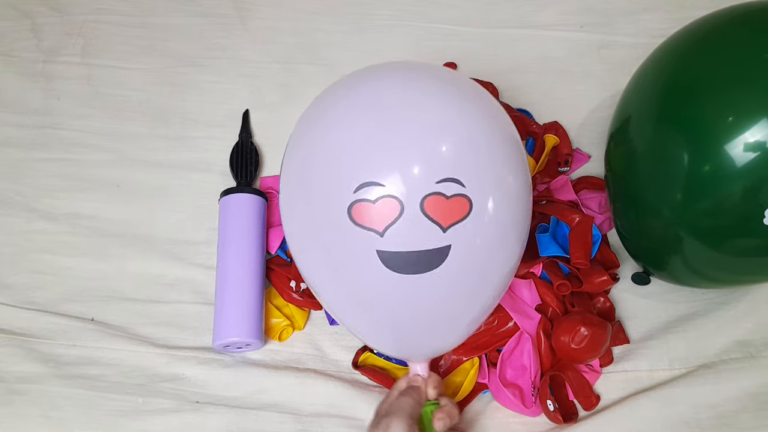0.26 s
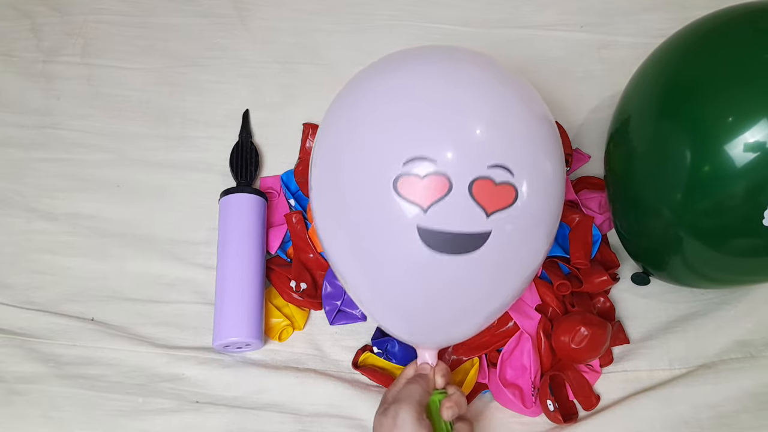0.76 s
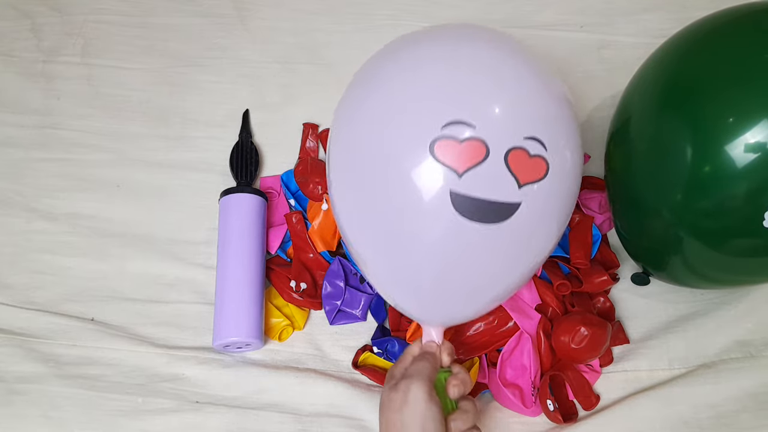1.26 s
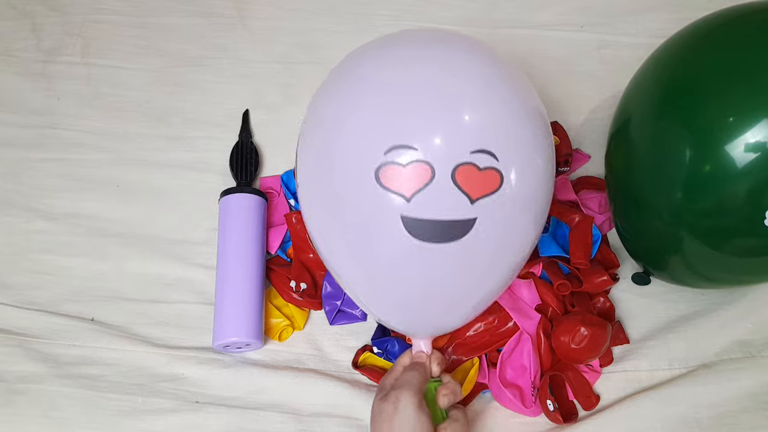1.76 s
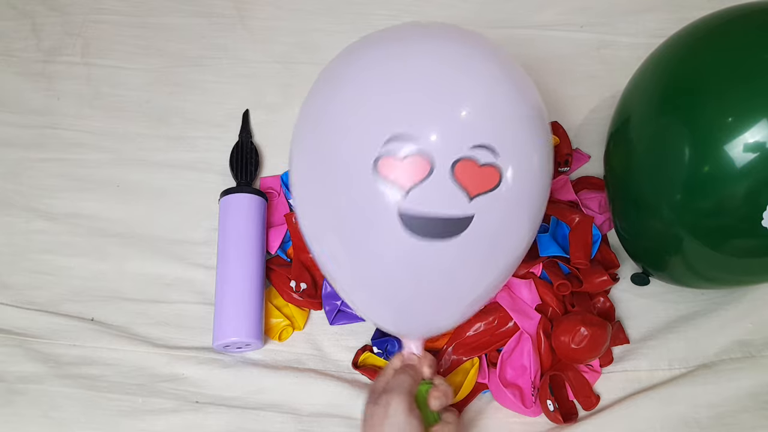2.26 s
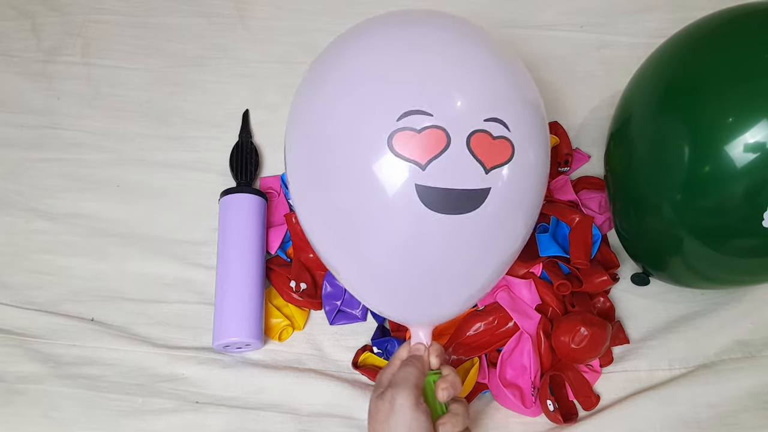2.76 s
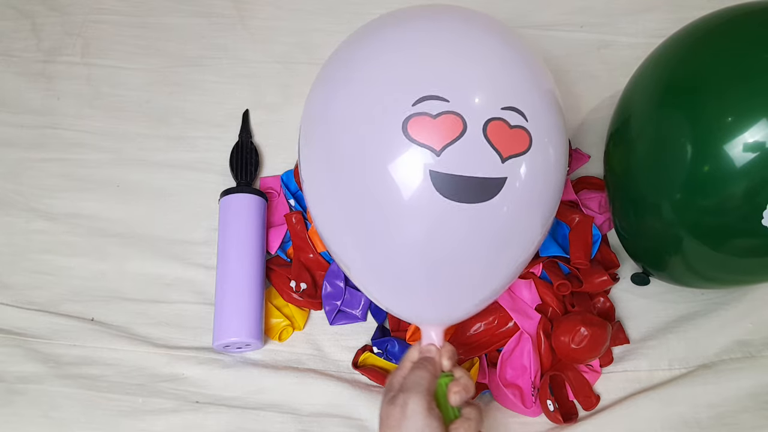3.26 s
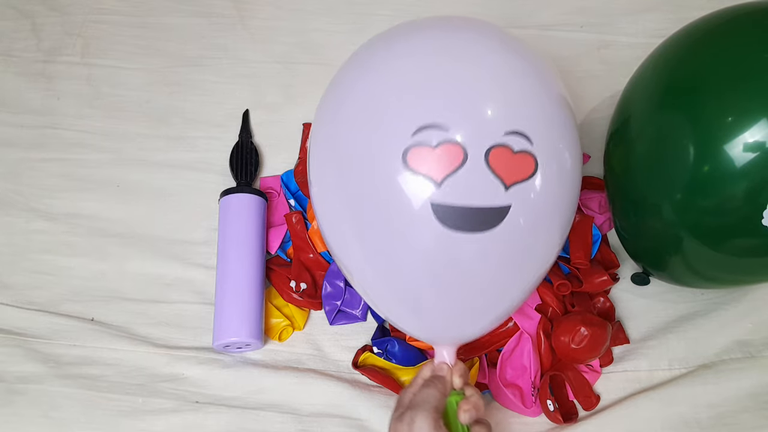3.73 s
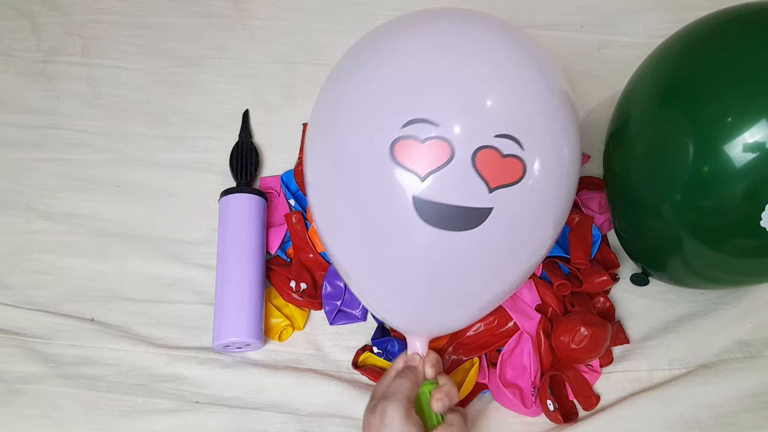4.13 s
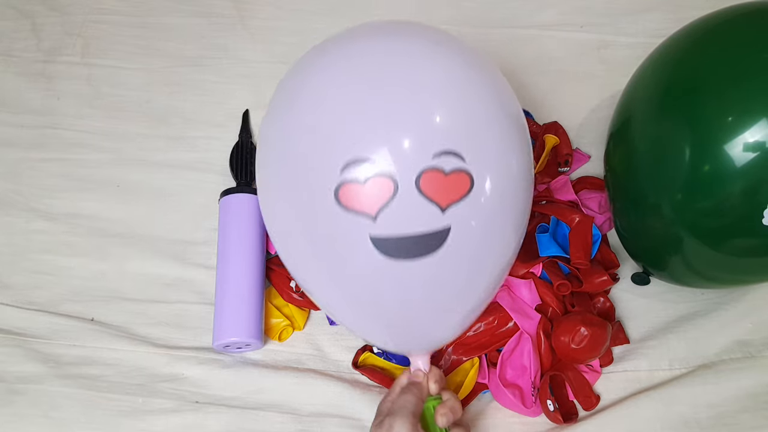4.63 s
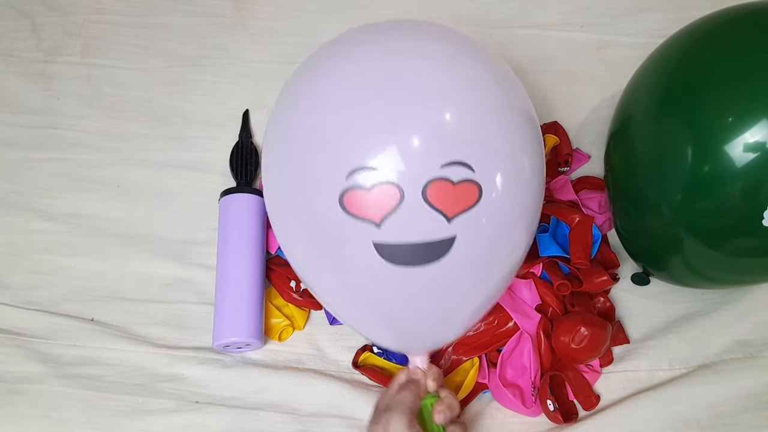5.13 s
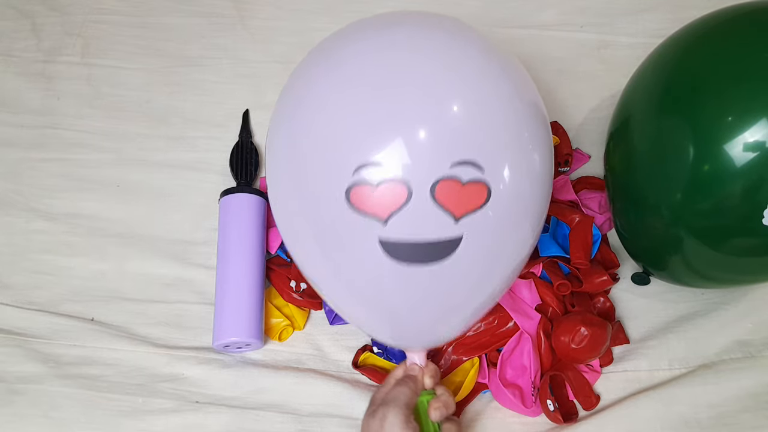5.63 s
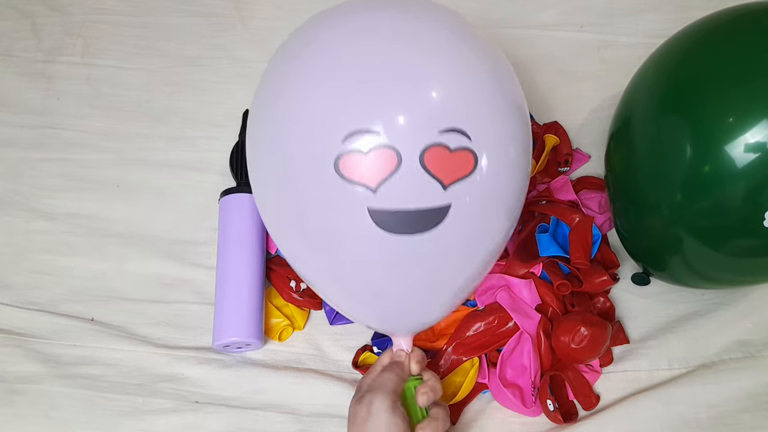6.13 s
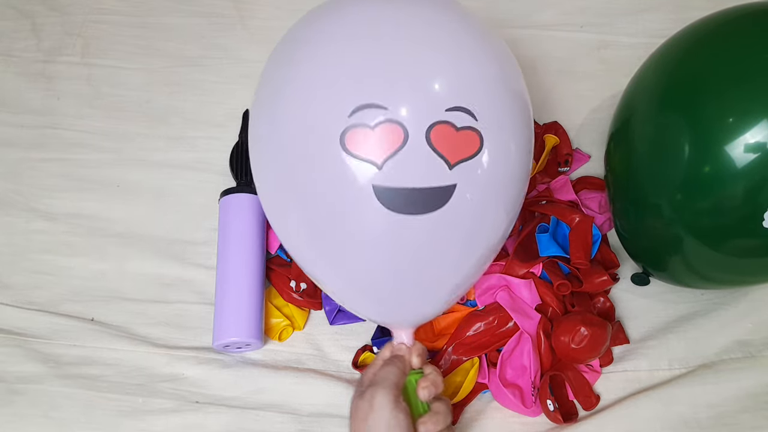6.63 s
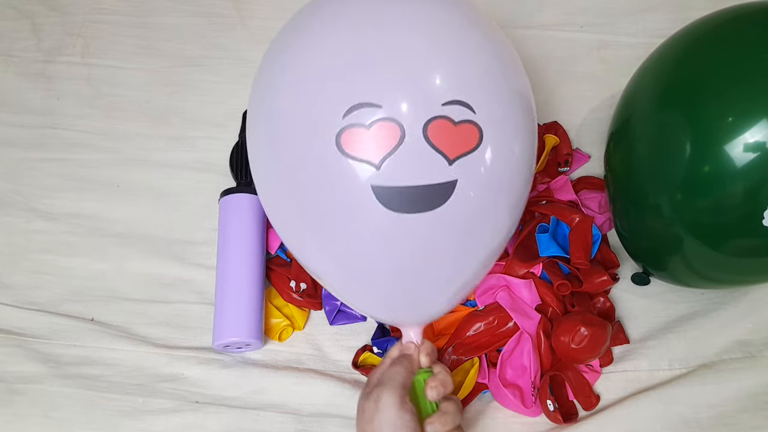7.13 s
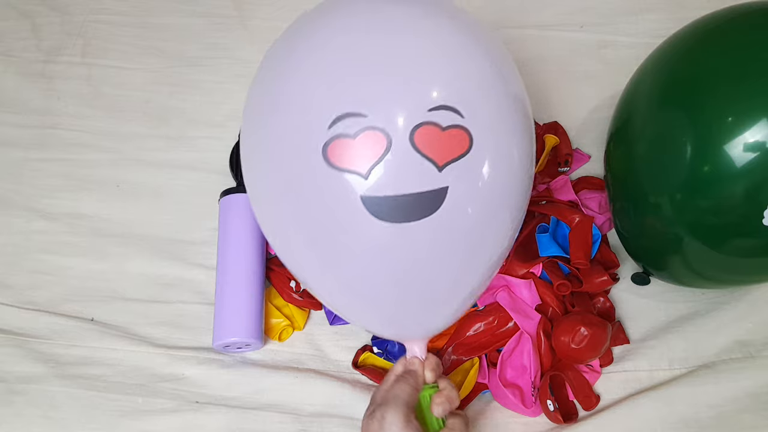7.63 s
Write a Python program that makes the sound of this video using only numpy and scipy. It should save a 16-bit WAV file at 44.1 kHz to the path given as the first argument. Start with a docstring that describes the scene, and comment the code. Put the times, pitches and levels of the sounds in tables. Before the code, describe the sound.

A plastic hand pump inflates a latex balloon close to the microphone. Breathy hisses alternate on pull and push, more than two full cycles each second, without pause. Each push begins with a faint rustle and a small hollow valve pop, and soft low bumps mark the piston's stop. A few plastic clicks occur between about two and four seconds. A low uneven handling rumble and faint hiss lie underneath in a small, quickly fading room.

```python
"""A low uneven rumble and a faint hiss (shaped noise) run throughout; a hand pump fills a latex balloon.
Air hisses on every pull and push: noise follows the piston's speed and brightens as the balloon fills.
As a push begins the seal rustles and a valve pops (damped tones); strokes open with a rising whistle.
Soft low bumps (damped modes, noise clack) mark the piston at its stop, two come with clicks; between
about 2 and 4 s, a few plastic clicks. A small room answers the pops, bumps and clicks."""
import sys
import numpy as np
from scipy import signal
from scipy.fft import rfft, irfft, next_fast_len
from scipy.io import wavfile
from scipy.ndimage import uniform_filter1d, map_coordinates

SR = 44100
rng = np.random.default_rng(int(sys.argv[2]) if len(sys.argv) > 2 else 0)


def put_to_file(sound):
    """Save the sound as 16-bit audio at rate SR, in the file named by the first command-line argument."""
    columns = np.atleast_2d(sound).T  # one column per channel
    safe = np.clip(columns, -1, 1)
    whole_steps = np.round(safe * 32767)
    wavfile.write(sys.argv[1], SR, whole_steps.astype(np.int16))


N = 347944


def amp(db):
    """Decibels to gain."""
    return 10 ** (np.asarray(db) / 20)


def unit(x):
    """Scale to rms 1."""
    return x / np.sqrt(np.mean(x ** 2) + 1e-20)


def along(points, hz):
    """(Hz, value) points read on a log axis."""
    point_hz, values = np.transpose(points)
    return np.interp(np.log(hz + 1), np.log(point_hz + 1), values)


def filtered(x, response):
    """x times a response of frequency."""
    size = next_fast_len(N + SR // 2)
    spectrum = rfft(x, size) * response(np.fft.rfftfreq(size, 1 / SR))
    return irfft(spectrum, size)[..., :N]


def wobble(knots_per_s):
    """A smooth random curve through normally distributed knots."""
    knots = rng.standard_normal(int(N * knots_per_s / SR) + 4)
    return map_coordinates(knots, [np.arange(N) * knots_per_s / SR])


def add(track, start_s, sound):
    """Mix a sound into a track at a time."""
    part = track[max(0, round(start_s * SR)):][:len(sound)]
    part += sound[:len(part)]


# Left-right correlation of noise. Each row: frequency in Hz, correlation from 0 to 1.
LIKENESS = [(100, .88), (300, .95), (1000, .72), (2500, .62), (3700, .5), (4600, .25), (9300, .05),
            (13000, .05)]


def noise(spectrum):
    """Stereo noise of rms 1, near mono in the bass and unrelated in the treble."""
    def mid_side_gains(hz):
        angle = np.arccos(np.clip(along(LIKENESS, hz), -1, 1)) / 2
        return amp(along(spectrum, hz)) * [np.cos(angle), np.sin(angle)]
    mid, side = filtered(rng.standard_normal((2, N)), mid_side_gains)
    return unit(np.array([mid + side, mid - side]))


def ring(modes, t, attack_s):
    """Damped modes, struck at slightly new strengths and pitches."""
    tones = 0
    for hz, db, t60_s in modes:
        decay = amp(db + rng.normal(0, 1) - 60 * t / t60_s)
        tones = tones + decay * np.sin(2 * np.pi * hz * rng.normal(1, 0.036) * t)
    return tones * (1 - np.exp(-t / attack_s))


# Low rumble. Each row: time in seconds, level in dB before jolts and wobble.
RUMBLE_LEVEL = [(0, -55.5), (0.6, -64), (1.3, -62), (2.2, -67.5), (3.1, -63), (3.7, -58.5), (4.3, -59.5),
                (4.7, -65.5), (5.5, -63), (6.6, -65), (7.0, -60.5), (7.89, -65)]
# Rumble spectrum. Each row: frequency in Hz, relative density in dB per Hz.
RUMBLE_SPECTRUM = [(22, -36), (33, -17), (48, 1.5), (100, -1.5), (150, -16.5), (260, -14), (500, -46),
                   (1500, -70)]
# Room floor spectrum. Each row: frequency in Hz, relative density in dB per Hz.
FLOOR_SPECTRUM = [(20, -22), (60, -17), (260, -14), (500, -6), (1500, -10), (5000, -1), (8000, -13),
                  (11000, -3.5), (16000, -17)]
# Soft low bumps: the piston at its stop, and two knocks that come with clicks (2.295 and 3.62 s).
# Also played by bumps(). Each row: time in seconds, level in dB before trims.
BUMP_TIMES = [(0.315, -40), (0.761, -42), (1.193, -41.5), (1.667, -38.5), (2.093, -38), (2.295, -50),
              (2.372, -44), (2.577, -38), (3.008, -43), (3.456, -43.5), (3.62, -42.5), (3.888, -39.5),
              (4.326, -40), (4.753, -40), (5.187, -41), (5.616, -40.5), (6.051, -44), (6.481, -40.5),
              (6.902, -42.5), (7.336, -41.5), (7.753, -41)]
JOLT_DB, JOLT_S = 5.5, 0.03  # swell at each bump, time to its peak


def background(uneven_db=5.0, floor_db=-65.0):
    """An uneven low handling rumble that swells after every bump, and a faint even hiss."""
    jolts, t = np.zeros(N), np.arange(SR // 2) / SR
    for s, _ in BUMP_TIMES:
        add(jolts, s, t / JOLT_S * np.exp(1 - t / JOLT_S))
    level_db = np.interp(np.arange(N) / SR, *np.transpose(RUMBLE_LEVEL))
    level_db = level_db + JOLT_DB * jolts + uneven_db * wobble(12)
    rumble = amp(level_db) * noise(RUMBLE_SPECTRUM)
    return rumble + amp(floor_db) * noise(FLOOR_SPECTRUM)


def patchy(x, depth_db):
    """Turbulence shifts the colour of the hiss from one moment to the next."""
    z = signal.stft(x, nperseg=512)[2]
    field = uniform_filter1d(rng.standard_normal(z.shape[1:]), size=4, axis=0)  # across frequency
    field = uniform_filter1d(field, size=22, axis=1)  # across time
    return signal.istft(z * amp(depth_db * unit(field)), nperseg=512)[1][:, :N]


def nearby(x, echo_db, life_s):
    """Close surfaces return a dense spray of echoes that ripples the spectrum."""
    t = np.arange(SR // 16) / SR
    spray = rng.standard_normal((2, len(t))) * t / life_s * np.exp(-t / life_s)
    spray = spray + spray.mean(0)  # both ports share part of it
    spray *= amp(echo_db) / np.linalg.norm(spray, axis=1, keepdims=True)
    return unit(x + signal.fftconvolve(x, spray, axes=1)[:, :N])


# Rod pulled out; also played by sizzle(). Each row: fastest flow in seconds, level in dB before tone.
PULL_STROKES = [(-0.018, -35.5), (0.438, -42.5), (0.87, -42.5), (1.326, -41), (1.789, -42.5), (2.23, -38.5),
                (2.704, -43.5), (3.164, -51.5), (3.575, -45), (4.008, -43), (4.446, -43), (4.875, -44),
                (5.305, -44), (5.735, -40.5), (6.174, -43), (6.598, -42.5), (7.018, -46), (7.456, -44),
                (7.872, -47.5)]
# Rod pushed in; also played by sizzle(). Each row: fastest flow in seconds, level in dB before tone.
PUSH_STROKES = [(0.21, -38), (0.65, -40.5), (1.083, -38.5), (1.557, -36.5), (1.999, -38), (2.475, -37.5),
                (2.922, -42), (3.357, -43.5), (3.795, -41.5), (4.226, -39), (4.658, -40), (5.086, -37),
                (5.522, -37.5), (5.955, -38), (6.388, -39.5), (6.813, -43), (7.238, -43), (7.662, -42.5)]
# Stroke shapes. Columns: rise in seconds, fall in seconds, base brightness in dB.
PULL_FLOW = (.034, .044, 1.8)
PUSH_FLOW = (0.033, 0.05, 1)
# Air through the valves. Each row: frequency in Hz, relative density in dB per Hz.
JET_SPECTRUM = [(40, -5), (150, -8), (290, -6.5), (450, -8), (1000, -5.5), (1700, -3), (2300, -5.5),
                (2700, -2.5), (4500, -0.5), (6500, -3), (8100, -9.5), (9300, -2.5), (12500, -2.5),
                (15800, -11.5)]
# Resonances of the air passages. Each row: frequency in Hz, width in Hz, gain in dB.
PASSAGES = [(1800, 100, 4.5), (2000, 42, 3), (2552, 130, 6), (3250, 240, 2.5), (3780, 170, 3.5),
            (4720, 100, 3), (5270, 120, 4.5), (5960, 120, 4)]
USUAL_DB = -40  # a usual stroke
DULLING_DB_PER_DB, BRIGHTEN_DB_PER_S = 0.17, 0.16  # with extra effort; as the balloon fills
TREBLE_LEAD_S = 0.0048  # treble peaks before body


def air(hiss_db=1.0, flutter_db=0.51, pull_body_db=1.0):
    """The flow swells and fades with the piston's speed; harder strokes have more body."""
    t = np.arange(N) / SR
    low_power, high_power = np.zeros((2, N))
    kinds = (PUSH_STROKES, PUSH_FLOW, 0), (PULL_STROKES, PULL_FLOW, pull_body_db)
    for strokes, (rise_s, fall_s, tone_db), body_db in kinds:
        def flow(d):
            return np.exp(-(d / np.where(d < 0, rise_s, fall_s)) ** 2 / 2)
        for s, db in strokes:
            near = slice(max(0, int((s - 1 / 4) * SR)), int((s + 1 / 4) * SR))
            d = t[near] - s
            effort_db = db - USUAL_DB
            bright_db = tone_db - DULLING_DB_PER_DB * effort_db + BRIGHTEN_DB_PER_S * (s - t[-1] / 2)
            low_power[near] += (flow(d) * amp(db + body_db - bright_db / 2)) ** 2
            high_power[near] += (flow(d + TREBLE_LEAD_S) * amp(db + bright_db / 2)) ** 2

    def passages(f):
        return amp(sum(db / (1 + (2 * (f - hz) / width_hz) ** 2) for hz, width_hz, db in PASSAGES))
    jet = patchy(filtered(noise(JET_SPECTRUM), passages), depth_db=2.0)
    jet = nearby(jet, echo_db=-6.5, life_s=0.007)
    body = filtered(jet, lambda hz: 1 / (1 + (hz / 6500) ** 4))
    hiss = body * np.sqrt(low_power) + (jet - body) * np.sqrt(high_power)
    return amp(hiss_db + flutter_db * wobble(170)) * hiss


# Pops as a push begins. Each row: start in seconds, flap pitch in Hz, flap level in dB, barrel level in dB.
VALVE_POPS = [(0.118, 770, -40.5, -38), (0.558, 657, -38, -38.5), (0.993, 683, -42.5, -37),
              (1.46, 780, -43.5, -41.5), (1.91, 692, -43.5, -38.5), (2.376, 990, -51, -46.5),
              (2.829, 930, -47.5, -45.5), (3.281, 1000, -35, -41.5), (3.698, 925, -36.5, -44),
              (3.753, 910, -37.5, -52), (4.135, 875, -37, -42), (4.179, 1006, -41, -61),
              (4.566, 1017, -33.5, -39), (4.989, 917, -32, -37), (5.428, 755, -36.5, -36),
              (5.859, 765, -34.5, -37.5), (6.3, 754, -37.5, -35.5), (6.724, 830, -31.5, -39),
              (7.147, 905, -31, -39), (7.576, 915, -30, -40.5)]
# Barrel modes. Each row: nominal frequency in Hz, relative level in dB, T60 in seconds.
BARREL_MODES = [(355, 4, 0.022), (489, -2, 0.023), (680, -20, 0.0066), (1770, -35, 0.0095)]
# Rustle as the piston turns. Each row: frequency in Hz, relative level in dB.
RUSTLE_SPECTRUM = [(100, -7), (300, 1), (600, -1.5), (1000, -5), (1800, -9.5), (3000, -31), (6000, -22),
                   (16000, -49)]
# Tick of the flap's edge. Each row: frequency in Hz, relative level in dB.
TICK_SPECTRUM = [(400, -6), (1700, -1), (3000, -15), (6000, -17), (16000, -35)]


def valve(swell_s=0.0042, width_s=0.0013, upper_ratio=1.79, upper_db=-22, lead_s=0.0169,
          rustle_db=-14.0, rustle_t60_s=0.039, tick_db=-22, tick_t60_s=0.012):
    """The seal rustles as the piston turns; the flap pops: a few cycles, a tick, a knock in the barrel."""
    out, rustle, tick = np.zeros((3, N))
    t = np.arange(SR // 10) / SR
    for s, hz, flap_db, barrel_db in VALVE_POPS:
        phase = 2 * np.pi * hz * t
        tones = np.sin(phase) + amp(upper_db) * np.sin(upper_ratio * phase)
        flap = np.exp(-((t - swell_s) / width_s) ** 2 / 2) * tones
        force = np.hypot(amp(flap_db), amp(barrel_db))
        knock_s = s + 0.00301
        onset = 1 - np.exp(-t / 0.0022)
        add(rustle, s - lead_s, force * amp(rustle_db - 60 * t / rustle_t60_s) * onset)
        add(out, s, amp(flap_db) * flap)
        add(out, knock_s, -amp(barrel_db) * ring(BARREL_MODES, t, attack_s=0.00047))
        add(tick, knock_s, force * amp(tick_db - 60 * t / tick_t60_s))
    return out + rustle * noise(RUSTLE_SPECTRUM) + tick * noise(TICK_SPECTRUM)


SIZZLE_DB, SIZZLE_LEAD_S, SIZZLE_S = -20, 0.062, 0.013  # re usual stroke; before fastest flow; spread
SIZZLE_HZ, SIZZLE_RISE_HZ_PER_S, SIZZLE_WIDTH_HZ = 10240, 50000, 600  # pitch climbs with the flow


def sizzle(push_db=-3):
    """Air at the barely open valve: each stroke opens with a thin, breathy, upward whistle."""
    sweep, d = np.zeros(N), np.arange(-SR // 20, SR // 20) / SR
    cycles = (SIZZLE_HZ + SIZZLE_RISE_HZ_PER_S * d / 2) * d
    glide = np.exp(-(d / SIZZLE_S) ** 2 / 2) * np.sin(2 * np.pi * cycles)
    for strokes, db in (PUSH_STROKES, push_db), (PULL_STROKES, 0):
        for s, _ in strokes:
            if s > SIZZLE_LEAD_S:
                add(sweep, s - SIZZLE_LEAD_S + d[0], amp(USUAL_DB + SIZZLE_DB + db) * glide)
    # slow noise multiplies the whistle, blurring its pitch
    blur = filtered(rng.standard_normal((2, N)), lambda hz: np.exp(-(hz / SIZZLE_WIDTH_HZ) ** 2 / 2))
    return np.sqrt(2) * sweep * unit(blur)


# Piston and hand modes. Each row: nominal frequency in Hz, relative level in dB, T60 in seconds.
THUD_MODES = [(93.9, -2.5, 0.11), (153, -9, 0.049), (205.5, 1.5, 0.025), (259.4, 8, 0.017),
              (320, -15, 0.013)]
# Clack of the loose rod. Each row: frequency in Hz, relative level in dB.
CLACK_SPECTRUM = [(100, -12), (900, 1), (1800, 2.5), (2600, -2), (4400, 0), (7500, -15), (10500, -3),
                  (16000, -13)]
SETTLE_S, SETTLE_DB = 0.018, -2  # last thud: extra delay, level re bump


def bumps(thud_db=0, clack_db=-10, slack_s=0.00588, rebound_db=-3):
    """Each soft low bump is a thud of damped modes, a noise clack with a rebound, and a settling thud."""
    out, clack, t = np.zeros(N), np.zeros(N), np.arange(SR // 5) / SR
    for s, db in BUMP_TIMES:
        add(out, s + 0.0018, amp(db + thud_db) * ring(THUD_MODES, t, attack_s=0.0032))
        add(out, s + 0.0019 + slack_s, -amp(db + rebound_db) * ring(THUD_MODES, t, attack_s=0.0068))
        add(clack, s + slack_s, amp(db + clack_db - 60 * t / 0.045))
        add(out, s + 0.0021 + SETTLE_S, amp(db + SETTLE_DB) * ring(THUD_MODES, t, attack_s=0.0022))
    return out + clack * noise(CLACK_SPECTRUM)


# Plastic clicks. Each row: start in seconds, level in dB before trims.
CLICK_TIMES = [(2.2956, -31.5), (2.9163, -23.5), (2.353, -44.5), (2.981, -39), (3.617, -32), (3.677, -41.5),
               (3.753, -29), (4.0667, -35.5), (4.18, -27)]
# Click spectrum. Each row: frequency in Hz, relative level in dB.
PLASTIC_SPECTRUM = [(500, -6.5), (1000, 0), (2500, -11), (4500, 0), (7500, -7), (11000, -7.5), (16000, -20)]
# Modes of the pump's plastic. Each row: nominal frequency in Hz, relative level in dB, T60 in seconds.
SHELL_MODES = [(1220, -17, 0.017), (1700, 0, 0.022), (4370, 3, .016), (5730, -1, .014), (9800, 8, 0.017)]


def clicks(click_db=-8, shell_db=-11, life_s=0.0016):
    """Plastic parts snap against each other and briefly ring the pump's shell."""
    blows, shell, t = np.zeros(N), np.zeros(N), np.arange(SR // 20) / SR
    for s, db in CLICK_TIMES:
        add(blows, s, amp(db + click_db) * t / life_s * np.exp(1 - t / life_s))
        add(shell, s, amp(db + shell_db) * ring(SHELL_MODES, t, attack_s=0.0012))
    return blows * noise(PLASTIC_SPECTRUM) + shell


# Room decay. Each row: frequency in Hz, T60 in seconds.
ROOM_DECAY = [(100, 0.12), (500, 0.28), (1000, 0.25), (3000, 0.16), (12000, 0.039)]


def room(x, gap_s=0.00588):
    """The walls answer after a gap with decaying noise; the treble dies first."""
    hz, t, z = signal.stft(rng.standard_normal((2, SR // 3)), SR, nperseg=256)
    decay = amp(-60 * t / along(ROOM_DECAY, hz)[:, None])
    tail = signal.istft(z * decay, SR, nperseg=256)[1]
    tail = tail + 2 * tail.mean(0)  # both sides share part of it
    tail = np.pad(tail / np.linalg.norm(tail[0]), ((0, 0), (int(gap_s * SR), 0)))
    return signal.fftconvolve(x * np.ones((2, 1)), tail, axes=1)[:, :N]


def scene():
    """Pump close by, over a low handling rumble; the room answers pops and knocks."""
    floor, hiss, pops = background(), air(), valve()
    whistle, knocks = sizzle(), bumps() + clicks()
    echoes = amp(-7.0) * room(pops) + amp(-12.5) * room(knocks)
    return floor + hiss + pops + whistle + knocks + echoes


# Stereo balance. Each row: frequency in Hz, left minus right in dB.
BALANCE = [(300, 2.5), (1000, 0.5), (4400, 0), (5400, 5), (7700, 12.5), (8900, 0.5), (9800, -5),
           (13000, -0.5), (15800, 0)]
LOW_CUT_HZ, TOP_HZ = 35.4, 15850


def record(dry, lag_s=0.00003):
    """Two microphone ports colour the treble differently, left leads; deepest bass and top are cut."""
    def ports(hz):
        half_db = along(BALANCE, hz) / 2
        gains = amp([half_db, -half_db])
        gains = gains / np.sqrt(np.mean(gains ** 2, axis=0))
        delays = np.exp(1j * np.pi * hz * lag_s * np.array([[1], [-1]]))
        low_cut = 1 - 1 / (1 + (hz / LOW_CUT_HZ) ** 6)
        return gains * delays * low_cut * (hz < TOP_HZ)
    return filtered(dry, ports)


dry = scene()
out = record(dry)
put_to_file(out)
```